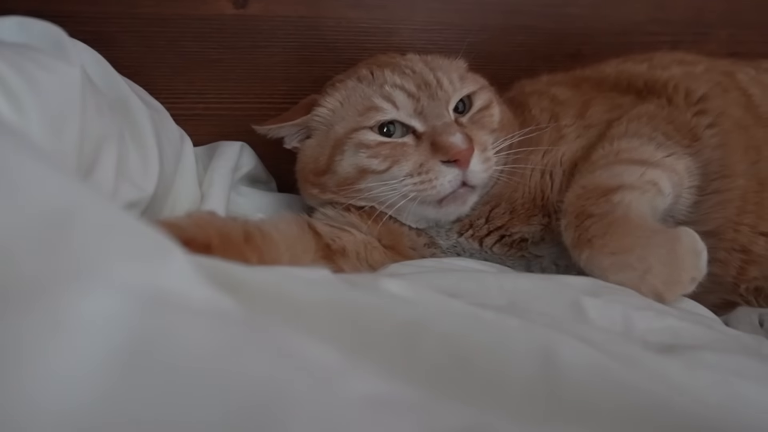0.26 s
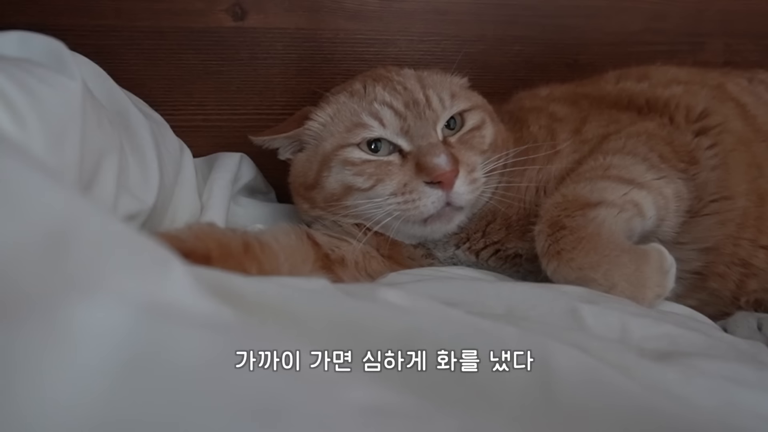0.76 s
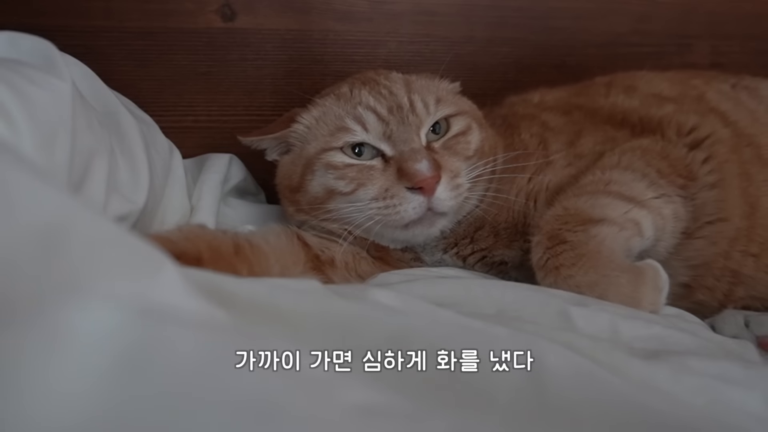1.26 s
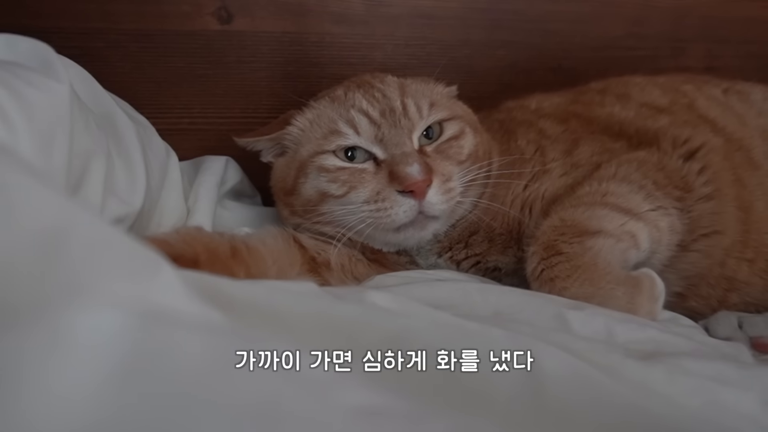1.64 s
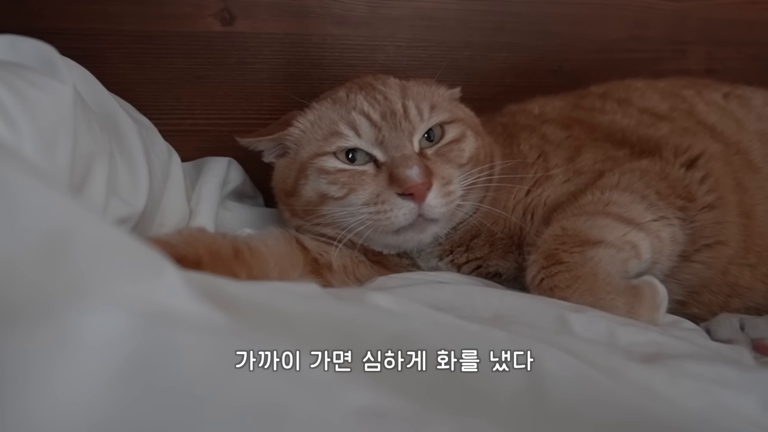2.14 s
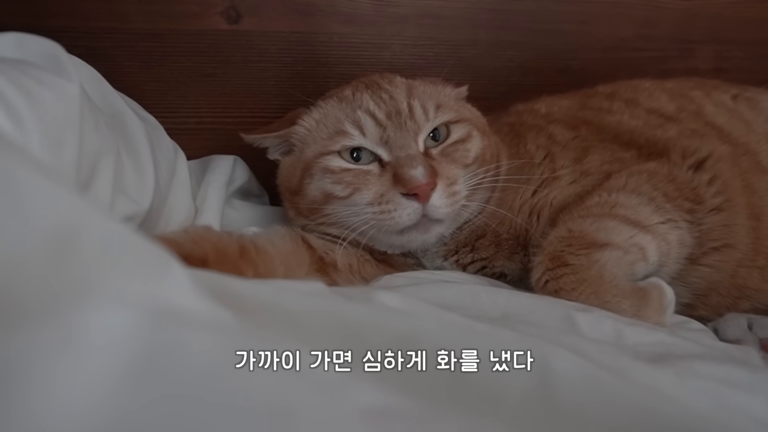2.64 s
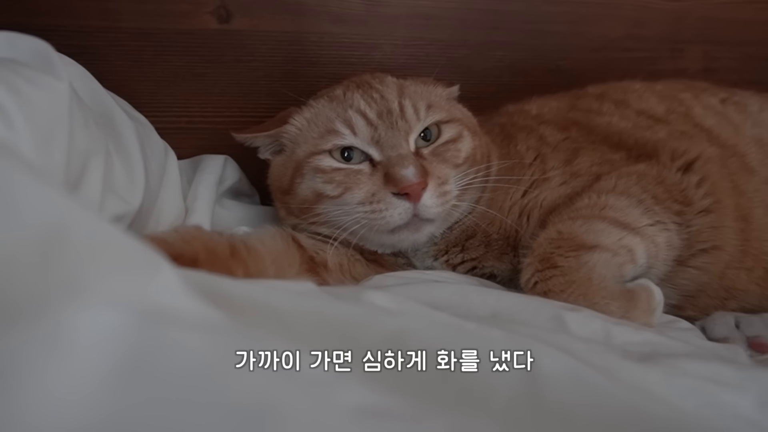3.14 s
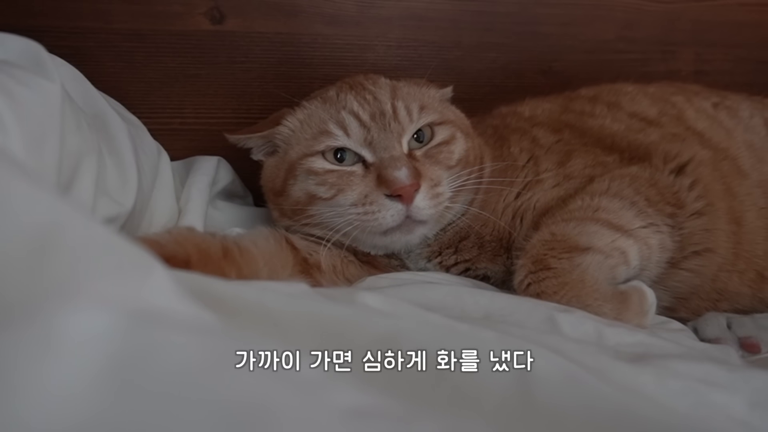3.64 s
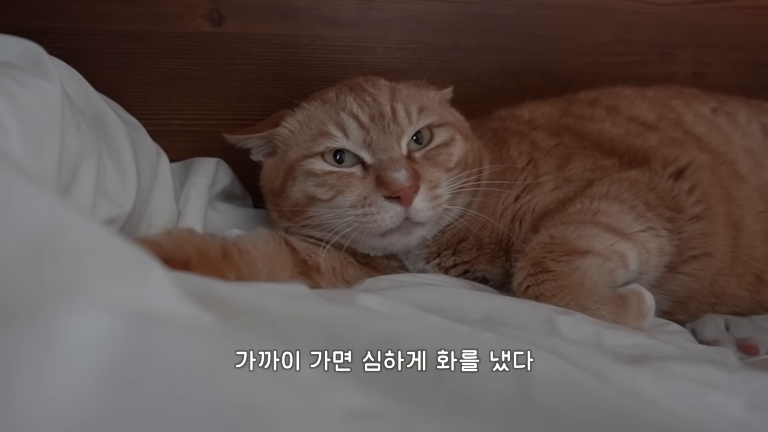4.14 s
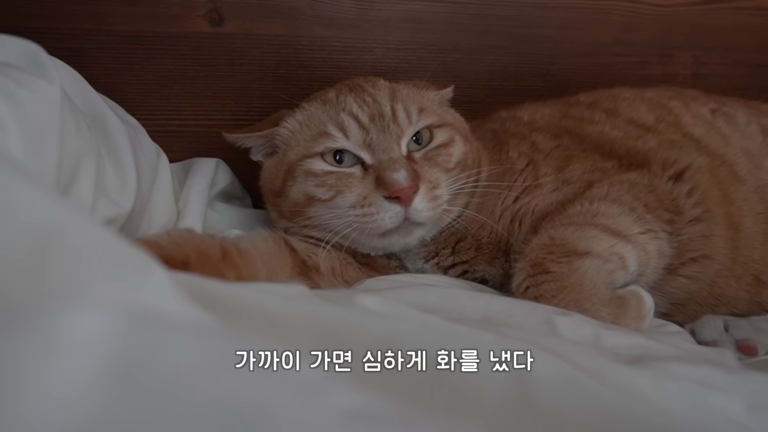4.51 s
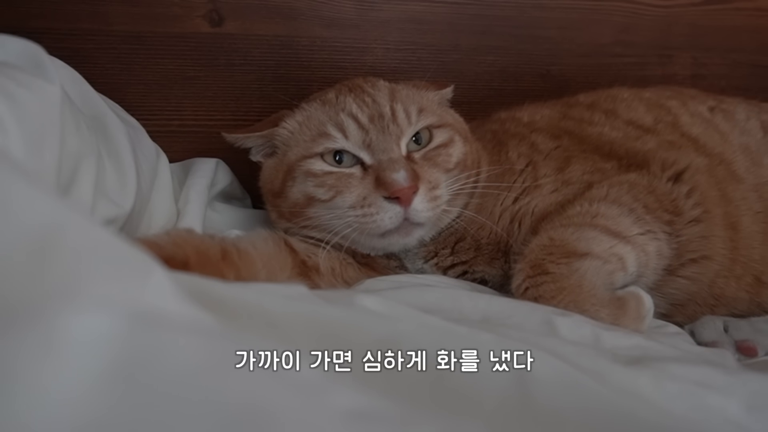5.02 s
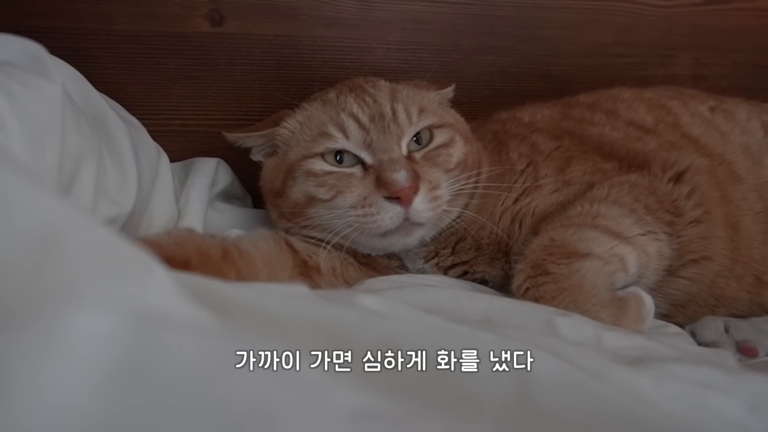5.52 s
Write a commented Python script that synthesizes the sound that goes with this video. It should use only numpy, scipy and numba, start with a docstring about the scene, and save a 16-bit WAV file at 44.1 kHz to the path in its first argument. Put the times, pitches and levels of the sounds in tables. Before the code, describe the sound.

An annoyed cat vocalises once, close to stereo microphones in a small, quiet, fairly dry room. From 0 to 0.28 seconds a quiet, thin moan climbs, then bursts into a loud hoarse screech, around 600 hertz, with rasp, quick swells and cracks into half pitch. From about 0.65 seconds it loses height; the mouth closes around 0.8 to 1.05, turning it darker and nasal. It slides steeply through 1.2 to 2 seconds, with two barely audible breath puffs near 1.1 and 1.3, into a growl near 120 hertz. Around 2.5 to 2.85 a very faint, wavering nostril whistle appears, and the growl hitches briefly upward near 2.7. It then sinks to about 90 hertz, buzzing and throbbing with a strong slow flutter until it fades quickly at 4.0 to 4.2. Only soft, uneven low rumble and faint wide hiss continue to about 6 seconds.

```python
"""A cat yowls: its pitch climbs to a hoarse screech, breaks into half pitch and slides down into a growl.
In the growl a second, slower flutter beats against the voice; then the cry fades out quickly.
Tones make its low partials; clicks and breath noise ring in the nose and the upper throat.
Two soft puffs of noise and a thin, wavering nostril whistle come with the cry.
Bands of stereo noise make the low rumble and the hiss of two microphones in the quiet room."""
import sys
import numpy as np
from scipy import signal
from scipy.io import wavfile
from scipy.ndimage import uniform_filter1d
from numba import njit

SR = 44100
rng = np.random.default_rng(int(sys.argv[2]) if len(sys.argv) > 2 else 0)


def dump(signal):
    """Clip the signal to [-1, 1] and save it as 16-bit WAV at the path in sys.argv[1]."""
    limited = np.clip(np.atleast_2d(signal).T, -1, 1)
    pcm = np.round(limited * 32767).astype(np.int16)
    wavfile.write(sys.argv[1], SR, pcm)


N = 254456   # length in samples

# pitch of the voice before its small shake: time_s, pitch_hz
PITCH = [(0.0, 413.4), (0.05, 440.3), (0.105, 447), (0.12, 476), (0.16, 480.6), (0.185, 554), (0.22, 556.8),
         (0.28, 611), (0.33, 617.4), (0.47, 615), (0.49, 625.6), (0.53, 591), (0.58, 618), (0.63, 604),
         (0.645, 562.6), (0.695, 534.7), (0.763, 563.8), (0.86, 530), (0.955, 508), (1.103, 461),
         (1.139, 480.5), (1.2, 428), (1.24, 408), (1.276, 316.5), (1.312, 363), (1.358, 272), (1.408, 278),
         (1.448, 246), (1.6, 198.5), (1.7, 171.4), (1.8, 157), (1.91, 134.1), (1.99, 120.6), (2.12, 123.4),
         (2.2, 121.4), (2.32, 124.2), (2.5, 118.9), (2.6, 126.3), (2.645, 137.1), (2.665, 161.9),
         (2.685, 170.6), (2.72, 158.3), (2.78, 120.3), (3.05, 97.2), (3.19, 90.44), (3.5, 90.37),
         (3.57, 91.36), (3.99, 93.53), (4.06, 99.53), (4.22, 98)]
# yowl, before swells; the last column sets the half pitch against the full pitch:
# time_s, level_db, mouth_resonance_hz, resonance_height_db, half_pitch_db
YOWL = [(0.0, -42, 1270, 16, -34), (0.105, -43, 1330, 24, -15), (0.118, -50, 1400, -7, -15),
        (0.16, -47, 1470, 30, -20), (0.2, -55, 1100, 23, -25), (0.235, -53, 1150, 14, -23),
        (0.279, -27, 1220, 29.5, -38), (0.31, -35.5, 1210, 24, -5.5), (0.39, -38.5, 1190, 24, -7),
        (0.403, -68, 1250, 34, -14), (0.415, -36.5, 1213, 31, 2), (0.47, -37.5, 1195, 20, -4),
        (0.53, -29, 1180, 36, -13), (0.628, -36.5, 1172, 29, -11), (0.645, -33, 822, 16, 10),
        (0.7, -32.5, 880, 17, 9), (0.85, -35, 812, 15.5, 1), (0.93, -36, 950, 8, -2),
        (0.97, -33.5, 535, 1, -11), (1.09, -34, 577, 25, 4.5), (1.14, -33.5, 450, 13, -22),
        (1.24, -35, 400, 13.5, -18), (1.276, -27, 317, 18, -32), (1.312, -31, 349.2, 10.5, -23),
        (1.4, -31, 280.6, 7, -23), (1.44, -32, 410, 2, -34), (1.56, -28.5, 345, 1.5, -24),
        (1.68, -28.5, 300, 12, -19), (1.74, -33, 300.4, 14, -22)]
# growl: time_s, level_db, mouth_resonance_hz, resonance_height_db
GROWL = [(1.699, -29.5, 339.5, 20), (1.8, -32, 312.4, 12.5), (1.88, -32, 269.3, 2), (1.99, -25.5, 355, 6.5),
         (2.17, -28.5, 369.1, 4.5), (2.32, -28, 330, 7.5), (2.5, -27.5, 323, 11), (2.6, -28.5, 307.2, 3.5),
         (2.65, -30, 250, 6), (2.68, -35, 343, 16), (2.73, -33.5, 307.6, 9.5), (2.78, -32.5, 250, 3),
         (2.84, -30, 229.8, 14), (3.05, -35, 200.1, 10.5), (3.19, -34.5, 210.1, -2.5),
         (3.57, -34.5, 189.7, 4.5), (3.99, -35, 190, 10.5), (4.09, -38.5, 196.6, 4), (4.15, -45, 198.9, 8),
         (4.175, -50, 198, -7), (4.219, -55, 203.2, 6)]
YOWL_DB_PER_OCTAVE, GROWL_DB_PER_OCTAVE = -5.5, -2   # slope of the partials at the vocal folds
HALF_DB_PER_OCTAVE = 4   # the half pitch is weakest in its lowest tone
WAVER_DB = .5   # each higher partial of the yowl wavers this much more
# unsteadiness of the vocal folds: time_s, roughness (0-1)
ROUGHNESS = [(0, .08), (.28, .05), (.31, .5), (.47, .45), (.5, .2), (.63, .25), (.66, .15), (.83, .12),
             (.87, .35), (.93, .3), (.96, .09), (1.12, .1), (1.2, .17), (1.4, .11), (1.68, .13), (1.75, .3),
             (1.95, .2), (2.6, .2), (2.7, .4), (2.85, .2), (3.2, .14), (4.2, .16)]
# sudden swells of the screech: time_s, gain_db, length_s
SWELLS = [(.327, 4, 0.0046), (.416, 12, 0.0029), (.446, 2, 0.0046), (.488, 9.5, 0.0054), (.599, 11, 0.0026),
          (.625, 8.5, 0.0074)]

# second oscillator in the throat; level of its tones against the voice: time_s, flutter_hz, level_db
FLUTTER = [(1.7, 62.05, -8), (2.0, 61.77, -18.5), (2.6, 60.62, -21.5), (2.7, 59.36, -30),
           (2.78, 58.53, -8.5), (2.9, 56.99, -6.5), (3.3, 56.37, -2), (3.7, 55.74, -1), (4.2, 55.03, -7.5)]
# short bouts of stronger flutter: time_s, gain_db, length_s
BOUTS = [(1.9, 6, 0.039), (2.11, 9.5, 0.035), (2.22, 12.5, 0.051), (2.4, 13.5, 0.025), (2.555, 13, .02)]
BOUT_LOSS = 0.29   # each higher partial loses this share of a bout's dB more
# tones where voice and flutter mix: multiple of pitch, multiple of flutter
MIXED_TONES = [(1, 1), (2, -1), (2, 1), (3, -1), (3, 1), (4, -1), (4, 1), (5, -1), (5, 1)]
# one level for each mixed tone, added to the flutter level: level_db
MIXED_DB = [-2.5, -7.5, -5, 2, -4.5, -14, -9, -35, -13]
MIXED_BLUR = 3.2   # the mixed tones are rougher than the partials

# a fixed resonance beside the mouth's; the partials drop steeply above TOP_HZ
HEAD_HZ, HEAD_PEAK_DB, TOP_HZ = 1220, 14, 1330
# share of the head resonance: time_s, level_db
HEAD_SHARE = [(0, -10), (.9, -8), (1.1, -11), (1.27, -6), (1.7, -35)]
# closing of the mouth, start and end: time_s
MOUTH_SHUTS_S = [0.784, 1.064]
# nose and upper throat, before swells: time_s, nose_db, second_hz, second_db, third_db
THROAT = [(0.0, -61, 2830, -53.5, -65), (0.13, -70, 2620, -52.5, -61.5), (0.17, -66, 2600, -58, -61.5),
          (0.2, -68, 2760, -45, -70), (0.24, -66, 2660, -54.5, -62), (0.29, -56, 2580, -40.5, -54),
          (0.35, -53.5, 2638, -46.5, -52), (0.49, -45, 2590, -47.5, -54), (0.53, -49, 2600, -43, -53.5),
          (0.62, -45, 2550, -44.5, -54.5), (0.7, -48, 2400, -38, -49.5), (0.8, -53, 2560, -44.5, -55),
          (0.9, -37.5, 2450, -48.5, -59), (0.96, -53, 2600, -53, -62), (1.12, -37, 2420, -55, -63.5),
          (1.23, -47.5, 2502, -67, -61.5), (1.31, -47.5, 2819, -72, -68), (1.36, -49, 2850, -71, -68),
          (1.43, -47, 2833, -69, -78), (1.5, -42.5, 2820, -71.5, -75), (1.8, -52, 2859, -71.5, -77.5),
          (2.17, -47, 2897, -69.5, -71), (2.6, -50, 2884, -71.5, -73.5), (2.7, -55, 2762, -72, -73.5),
          (2.82, -49, 2810, -66.5, -73), (3.04, -54, 2730, -66, -76), (3.25, -52, 2757, -62.5, -74),
          (3.95, -51, 2780, -66, -76.5), (4.12, -61.5, 2684, -65.5, -79), (4.22, -72, 2660, -66, -89)]
# closed-mouth resonances of the nose, lower and upper: pitch_hz, width_hz
NOSE = [(660, 54.5), (1080, 204)]
# upper nose resonance against the lower one, mouth open and shut: level_db
UPPER_NOSE_DB = [4, -8.5]
THIRD_HZ, FOURTH_HZ = [5400, 4200], [6170, 6522]   # throat resonances, mouth open and shut
SECOND_WIDTH_HZ, THIRD_WIDTH_HZ, FOURTH_WIDTH_HZ = 470, 570, 820
# fourth resonance against the third: time_s, level_db
FOURTH_SHARE = [(.75, -1), (1.2, -8.5), (1.8, -2), (2.7, -1.5), (3.2, 2.5)]
# broad rasp and a faint fifth resonance, levels against the third
AIR_DB, AIR_HZ, AIR_TOP_HZ, FIFTH_HZ, FIFTH_DB = -6.5, 2600, 3890, 8500, -15
PATCHY_DB = 1.5   # the throat sound comes in patches

# short soft bursts of hiss: time_s, peak_level_db, length_s
PUFFS = [(1.11, -53.5, 0.008), (1.312, -56.5, 0.012)]
# thin whistle in the nostril: time_s, pitch_hz, level_db
WHISTLE = [(2.48, 6986, -95), (2.5, 7100, -64), (2.58, 7274, -67), (2.64, 7895, -67), (2.68, 7300, -70),
           (2.73, 6952, -73), (2.78, 6500, -73), (2.84, 6400, -71), (2.87, 6428, -95)]
FIZZ_S, FIZZ_HZ, FIZZ_DB = 2.67, 14500, -67

# rumble and hiss, only the balance counts: frequency_hz, relative level_db per hz
ROOM = [(12, -46), (24, -20), (39, 6.5), (54, 1.5), (175, -20), (225, -7.5), (266, -18), (440, -21.5),
        (520, -19.5), (565, -27.5), (768, -22.5), (1100, -26), (1980, -30.5), (2920, -33.5), (15500, -42)]
ROOM_DB = -48.5   # level of the whole room tone
# how alike left and right are: frequency_hz, likeness (-1 to 1)
LIKENESS = [(60, 1), (110, 0.41), (200, 0.51), (380, 0.37), (700, 0.044), (1290, -0.38), (2380, -0.15),
            (4400, -0.16), (8120, 0.095), (15000, 0.15)]
# uneven level of the low room noise, as random noise happens to wander: time_s, level_db
RUMBLE_WANDER = [(0.0, -40.5), (0.18, -61), (0.21, -46), (0.64, -56), (0.93, -48), (1.46, -55.5),
                 (3.57, -49.5), (4.82, -60), (5.77, -54)]
RUMBLE_LOW_HZ, MONO_HZ = 44.4, 250   # the rumble thins out below; the sides agree below

SHADOW_HZ, SHADOW_WIDTH_HZ, SHADOW = 1210, 110, 0.47   # dip on the left, boost on the right; depth 0-1
SLANT, SLANT_HZ = 0.15, 2200   # the treble leans to the right, share 0-1
# near walls, in turn left and right: delay_s, level_db
ECHOES = [(.0031, -15), (.0074, -17), (.0123, -13), (.019, -18.5)]
CUTOFF_HZ = 15850


def from_db(db):
    """Turn a level in dB into a gain."""
    return 10 ** (np.asarray(db) / 20)


def rms_one(x):
    """Scale a sound to an average strength (rms) of 1."""
    return x / np.sqrt(np.mean(x ** 2) + 1e-20)


def evened(x):
    """Even out the strength to rms 1 as the sound goes, over 50 ms windows."""
    return x / np.sqrt(uniform_filter1d(x ** 2, size=SR // 20) + 1e-12)


def filtered(x, order, hz, kind):
    """Keep only the low, high or middle part of a sound."""
    return signal.sosfilt(signal.butter(order, hz, kind, fs=SR, output="sos"), x)


def in_time(rows):
    """Read each column of a table at every sample, with straight lines between the rows."""
    times_s, *columns = np.transpose(rows)
    return [np.interp(np.arange(N) / SR, times_s, column) for column in columns]


def at_hz(points, hz):
    """Read a spectrum at one frequency, on a log frequency axis."""
    points = np.array(points)
    return np.interp(np.log(hz), np.log(points[:, 0]), points[:, 1])


def wobble(rate_hz):
    """Slow noise: random wander up to a given rate, with spread 1."""
    return rms_one(filtered(rng.standard_normal(N), 2, rate_hz, "low"))


def bumps(rows):
    """Sum of bell-shaped bumps, each with a time (s), a height and a length (s)."""
    t = np.arange(N) / SR
    return sum(height * np.exp(-.5 * ((t - s) / length) ** 2) for s, height, length in rows)


@njit
def resonate(x, hz, width_hz, rate):
    """Two-pole resonance: each sample feeds back into the next two, and the centre may move."""
    y, r = np.zeros(len(x)), np.exp(-np.pi * width_hz / rate)
    for i in range(2, len(x)):
        drive = (1 - r * r) / 2 * (x[i] - x[i - 2])
        y[i] = drive + 2 * r * np.cos(2 * np.pi * hz[i] / rate) * y[i - 1] - r * r * y[i - 2]
    return y


def formant(x, hz, width_hz):
    """A steep resonance: the same one applied twice, then evened in level."""
    centre_hz = hz + np.zeros(N)
    once = resonate(x, centre_hz, width_hz, SR)
    return evened(resonate(once, centre_hz, width_hz, SR))


def hoarse_tone(phase, rough, spread_hz):
    """A sine of rms 1; roughness turns part of it into noise around the same pitch."""
    shake = rough * (wobble(spread_hz) + 1j * wobble(spread_hz)) / np.sqrt(2)
    steady = np.sqrt(1 - rough ** 2)
    return np.sqrt(2) * np.real((steady + shake) * np.exp(1j * phase))


def partial_gains(multiples, pitch_hz, mouth_hz, peak_db, db_per_octave, extra_db):
    """Partials slope with their number and pass the mouth and head resonances; together rms 1."""
    hz = multiples * pitch_hz

    def ring(centre_hz, db):
        return 1 / np.hypot(1 - (hz / centre_hz) ** 2, hz / centre_hz / from_db(db))

    head = from_db(in_time(HEAD_SHARE)[0]) * ring(HEAD_HZ, HEAD_PEAK_DB)
    tract = np.hypot(ring(mouth_hz, peak_db), head)
    slope = from_db(db_per_octave * np.log2(multiples) + extra_db)
    gain = slope * tract / np.hypot(1, (hz / TOP_HZ) ** 6)
    return gain / np.sqrt(np.sum(gain ** 2, axis=0))


def yowl_tones(phase, lean, pitch_hz, blur):
    """Six partials at steps of half the pitch; every other one, from the lowest, makes the half pitch."""
    level_db, mouth_hz, peak_db, half_db = in_time(YOWL)
    steps = np.arange(6)[:, None]
    multiples = (steps + 1) / 2
    half_pitch_db = (half_db + HALF_DB_PER_OCTAVE * np.log2(multiples)) * (steps % 2 == 0)
    gains = partial_gains(multiples, pitch_hz, mouth_hz, peak_db, YOWL_DB_PER_OCTAVE, half_pitch_db)
    tones = 0
    for k, gain in enumerate(gains):
        waver = from_db(WAVER_DB * k * wobble(12))
        tones += gain * waver * hoarse_tone((k + 1) / 2 * phase + lean, blur(k), spread_hz=220)
    return from_db(level_db) * tones


def growl_tones(phase, flutter, lean, pitch_hz, blur):
    """Six partials of the voice, plus tones at sums and differences of voice and flutter."""
    level_db, mouth_hz, peak_db = in_time(GROWL)
    flutter_db = in_time(FLUTTER)[1]
    bout_db = bumps(BOUTS)
    steps = np.arange(6)[:, None]
    gains = partial_gains(steps + 1, pitch_hz, mouth_hz, peak_db, GROWL_DB_PER_OCTAVE, 0)
    gains = gains * from_db(-BOUT_LOSS * steps * bout_db)
    tones = 0
    for k, gain in enumerate(gains):
        tones += gain * hoarse_tone((k + 1) * phase + lean, blur(k), spread_hz=100)
    for (k, j), db in zip(MIXED_TONES, MIXED_DB):
        mixed = hoarse_tone(k * phase + j * flutter + lean, blur(MIXED_BLUR * k - 1), spread_hz=71)
        tones += from_db(db + flutter_db + bout_db) * mixed
    return from_db(level_db) * tones


def nose_and_throat(phase, flutter, pitch_hz, rough, growling):
    """Clicks of the closing folds and pulsing breath noise ring in the nose and upper throat."""
    # one click a cycle; every other click is weak while the half pitch sounds
    cycle = np.floor(phase / (2 * np.pi))
    halved = np.minimum(from_db(in_time(YOWL)[3]), 1) * (1 - growling)
    clicks = np.diff(cycle, prepend=0) * (1 + halved * (-1) ** cycle)
    clicks *= 1 + .5 * growling * np.cos(flutter)
    breath = rng.standard_normal(N) * (1 + 0.29 * np.cos(phase)) * np.sqrt(pitch_hz / SR)

    t = np.arange(N) / SR
    shut = np.interp(t, MOUTH_SHUTS_S, [0, 1])
    third_hz = np.interp(t, MOUTH_SHUTS_S, THIRD_HZ)
    fourth_hz = np.interp(t, MOUTH_SHUTS_S, FOURTH_HZ)
    upper_nose_db = np.interp(t, MOUTH_SHUTS_S, UPPER_NOSE_DB)
    nose_db, second_hz, second_db, third_db = in_time(THROAT)
    fourth_db = third_db + in_time(FOURTH_SHARE)[0]

    # each region gets its own share of breath
    nasal = clicks + (4 * rough + .6 * shut + .3 * growling) * breath
    middle = clicks + (.3 + .7 * shut + 2.2 * rough + .6 * growling) * breath
    upper = clicks + (.35 + .5 * shut + 4 * rough) * breath

    nose = 0
    for (hz, width_hz), db in zip(NOSE, [0, upper_nose_db]):
        nose += from_db(db) * formant(nasal, hz, width_hz)
    nose *= from_db(nose_db)
    throat = from_db(second_db) * formant(middle, second_hz, SECOND_WIDTH_HZ)
    throat -= from_db(third_db) * formant(upper, third_hz, THIRD_WIDTH_HZ)
    throat += from_db(fourth_db) * formant(upper, fourth_hz, FOURTH_WIDTH_HZ)
    rasp = evened(filtered(clicks + 3 * breath, 2, [AIR_HZ, AIR_TOP_HZ], "band"))
    fifth = formant(upper, FIFTH_HZ, 2100.0)
    throat += from_db(third_db) * (from_db(AIR_DB) * rasp + from_db(FIFTH_DB) * fifth)
    return nose + throat * from_db(PATCHY_DB * wobble(10.2))


def cat():
    """One shaky pitch drives the yowl, then the growl, and the ringing of nose and throat."""
    t = np.arange(N) / SR
    pitch_hz = in_time(PITCH)[0]
    flutter_hz = in_time(FLUTTER)[0]
    rough = np.clip(in_time(ROUGHNESS)[0], 0, 1)
    growling = np.clip((t - GROWL[0][0]) / 0.015, 0, 1)   # 0 in the yowl, 1 in the growl
    sounding = np.clip((GROWL[-1][0] - t) / 0.056, 0, 1)   # short fade at the end
    phase = 2 * np.pi * np.cumsum(pitch_hz * (1 + 0.017 * rough * wobble(40))) / SR
    flutter = 2 * np.pi * np.cumsum(flutter_hz * (1 + 0.017 * wobble(32.0))) / SR
    # the pulse is lopsided while the pitch is high and turns into an upright peak at the bottom
    lean = -np.pi / 2 * np.clip((pitch_hz - 92) / 28, 0, 1)

    def blur(k):   # higher partials are rougher
        return np.minimum(rough * (.6 + .3 * k), 1)

    yowl = yowl_tones(phase, lean, pitch_hz, blur)
    growl = growl_tones(phase, flutter, lean, pitch_hz, blur)
    ringing = nose_and_throat(phase, flutter, pitch_hz, rough, growling)
    swell = from_db(bumps(SWELLS))
    # in dB, the swells reach the nose and throat only half as much
    return sounding * ((1 - growling) * swell * yowl + growling * growl + np.sqrt(swell) * ringing)


def room_tone():
    """Third-octave bands of stereo noise; the lowest share one uneven wander in level."""
    out, edges = 0, 18 * 2 ** (np.arange(31) / 3)
    white = rng.standard_normal((2, 2, N))   # two stereo noises take turns, so neighbour bands differ
    wander_db = in_time(RUMBLE_WANDER)[0]
    wander_db = wander_db - wander_db.mean()
    for k, (low, high) in enumerate(zip(edges, edges[1:])):
        mid, side = filtered(white[k % 2], 2, [low, high], "band")
        hz = np.sqrt(low * high)
        alike = np.clip(at_hz(LIKENESS, hz), -1, 1)
        gain = from_db(at_hz(ROOM, hz) + wander_db * (hz < 70))
        out = out + gain * (np.sqrt(1 + alike) * mid + np.sqrt(1 - alike) * side * [[1], [-1]])
    return from_db(ROOM_DB) * rms_one(filtered(out, 2, RUMBLE_LOW_HZ, "high"))


def puffs():
    """Soft puffs: bright noise under short bumps."""
    hiss = filtered(rng.standard_normal(N), 1, [900, 7000], "band")
    return rms_one(hiss) * bumps([(s, from_db(db), length) for s, db, length in PUFFS])


def whistle():
    """A wavering air tone, and a faint high fizz as it turns back."""
    hz, level_db = in_time(WHISTLE)
    phase = 2 * np.pi * np.cumsum(hz) / SR
    tone = from_db(2 * wobble(30)) * hoarse_tone(phase, .9, spread_hz=190)
    fizz = hoarse_tone(2 * np.pi * FIZZ_HZ * np.arange(N) / SR, 1, spread_hz=700)
    return from_db(level_db) * tone + bumps([(FIZZ_S, from_db(FIZZ_DB), .04)]) * fizz


def scene():
    """The cat in the middle, its sides tilted in tone, with thin echoes that differ left and right."""
    voice = cat() + puffs() + whistle()
    dip = SHADOW * resonate(voice, np.full(N, float(SHADOW_HZ)), SHADOW_WIDTH_HZ, SR)
    slant = SLANT * filtered(voice, 2, SLANT_HZ, "high")
    out = np.array([voice - dip - slant, voice + dip + slant])
    thin = filtered(voice, 3, 450, "high")
    for k, (delay_s, db) in enumerate(ECHOES):
        lag = round(delay_s * SR)
        out[k % 2, lag:] += from_db(db) * thin[:-lag]
    return out + room_tone()


def record(dry):
    """Close microphones hear nearly the same bass; the top is cut steeply."""
    mid, side = (dry[0] + dry[1]) / 2, (dry[0] - dry[1]) / 2
    side = filtered(side, 2, MONO_HZ, "high")
    top_cut = signal.cheby2(30, 60, CUTOFF_HZ, fs=SR, output="sos")
    return signal.sosfilt(top_cut, [mid + side, mid - side])


dry = scene()
out = record(dry)
dump(out)
```